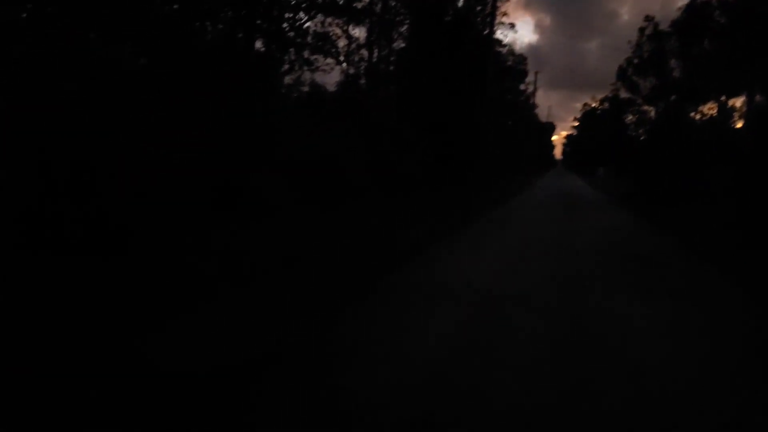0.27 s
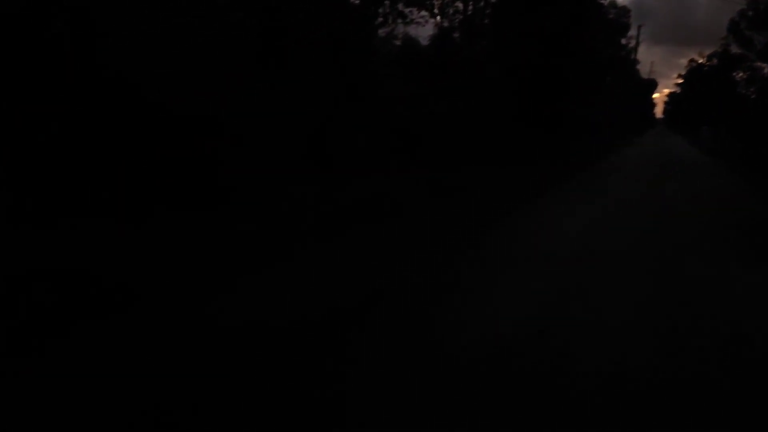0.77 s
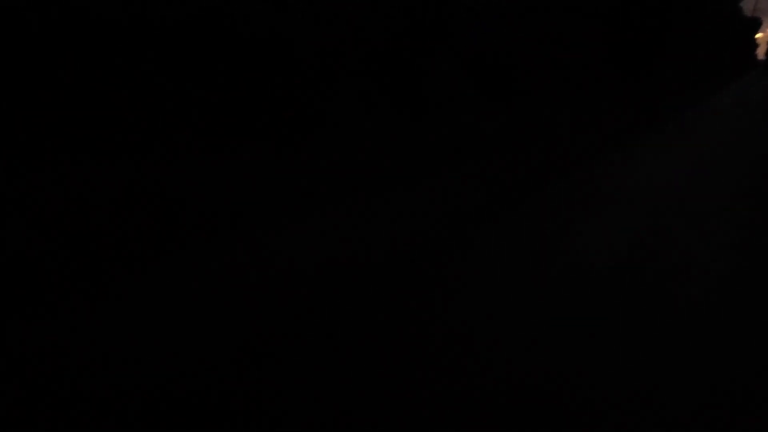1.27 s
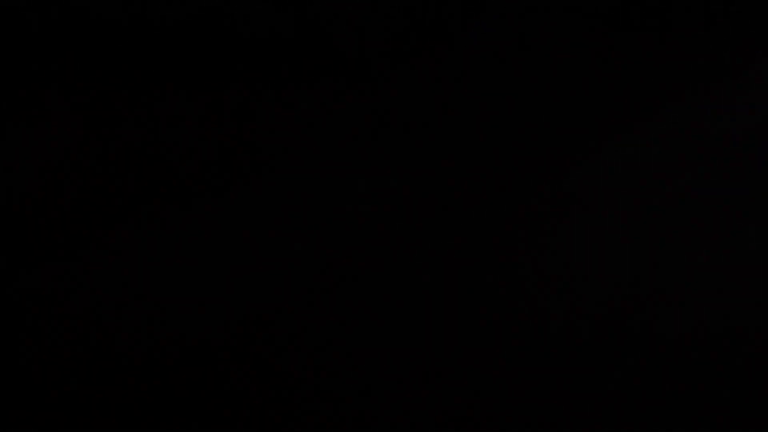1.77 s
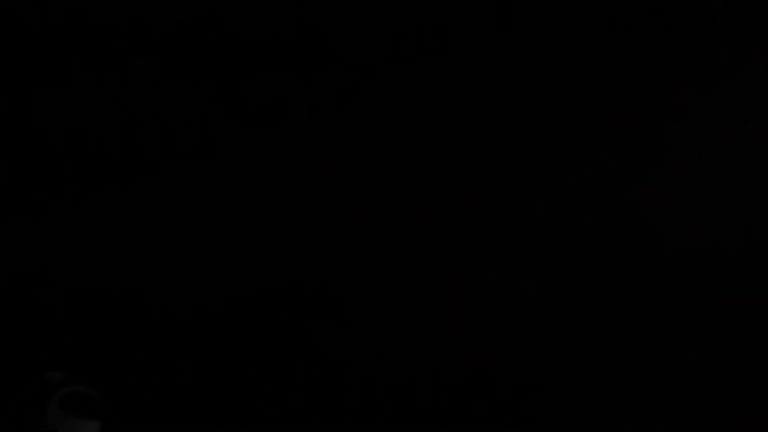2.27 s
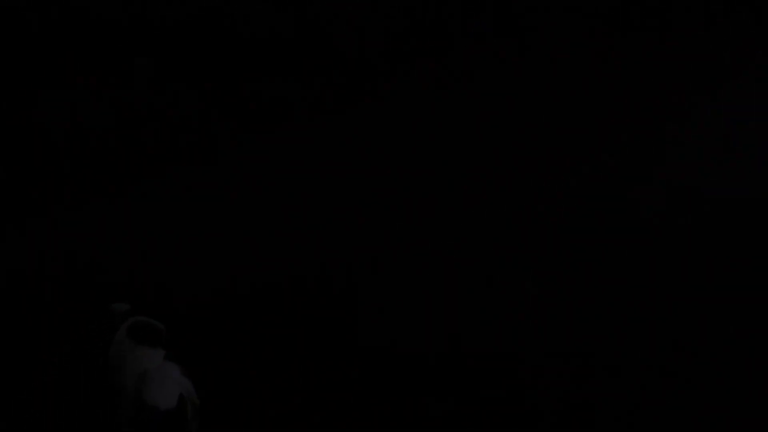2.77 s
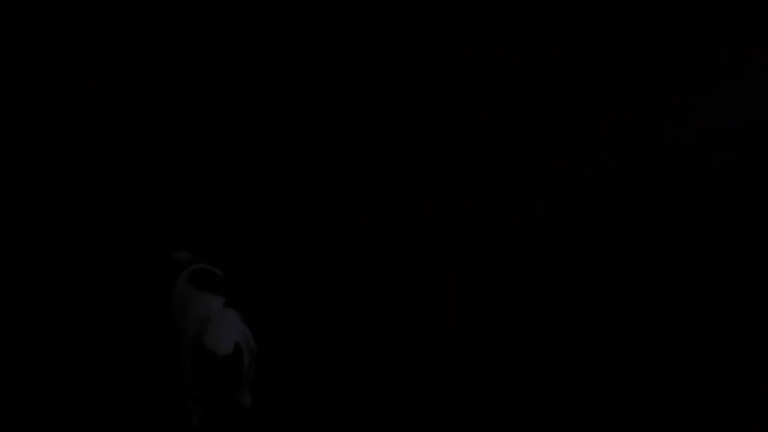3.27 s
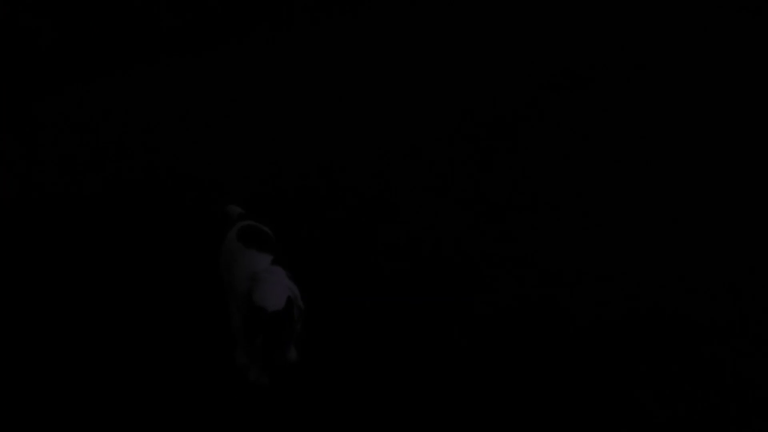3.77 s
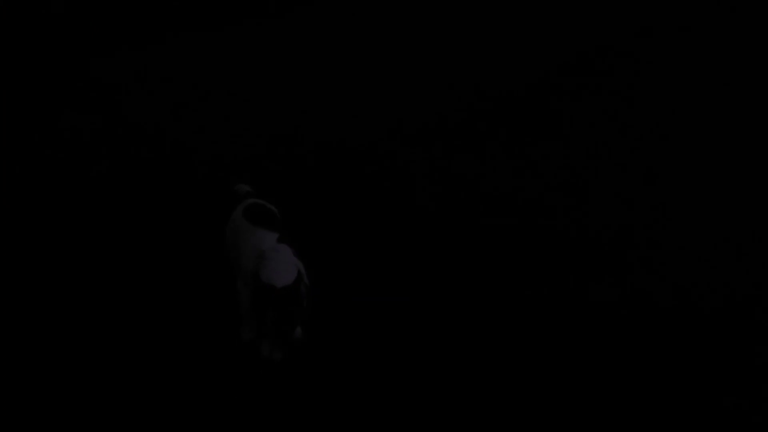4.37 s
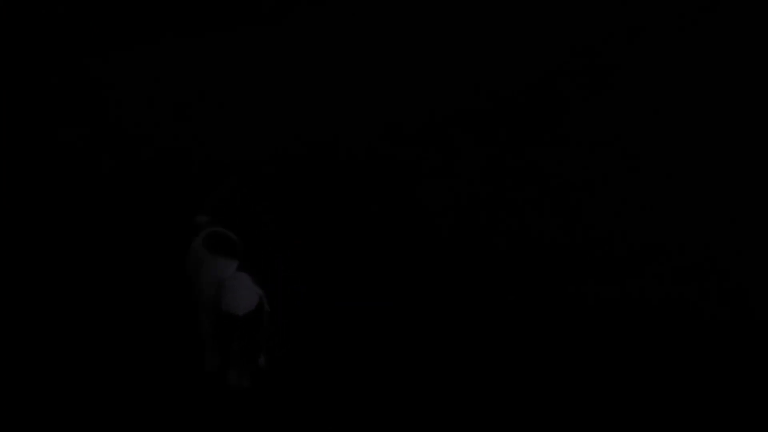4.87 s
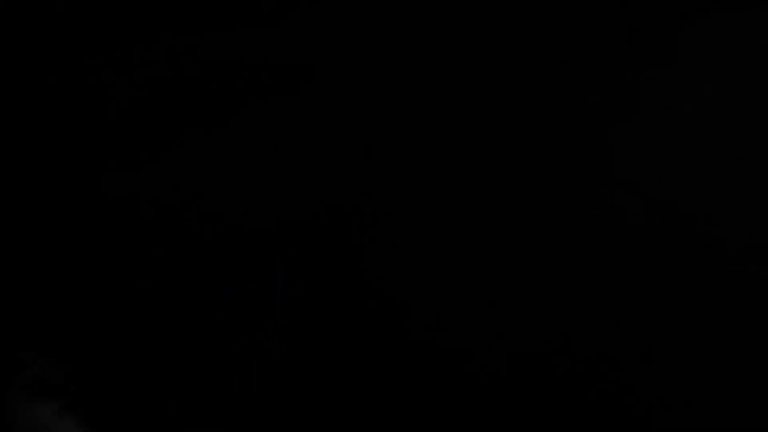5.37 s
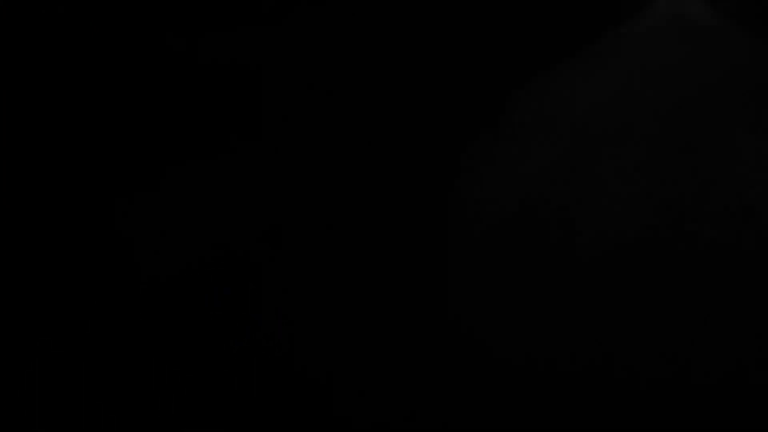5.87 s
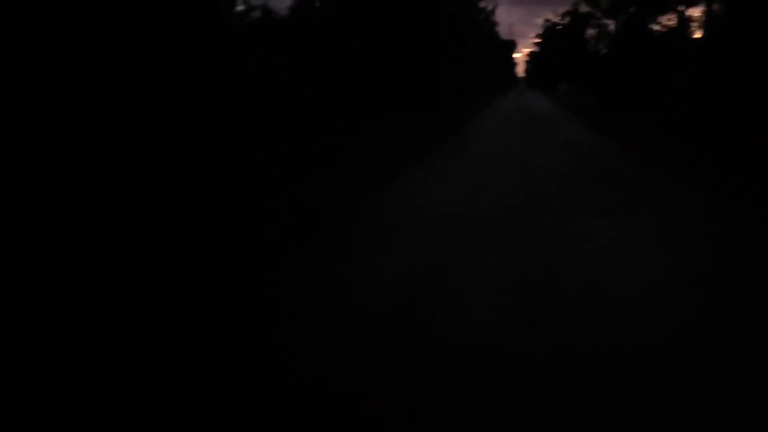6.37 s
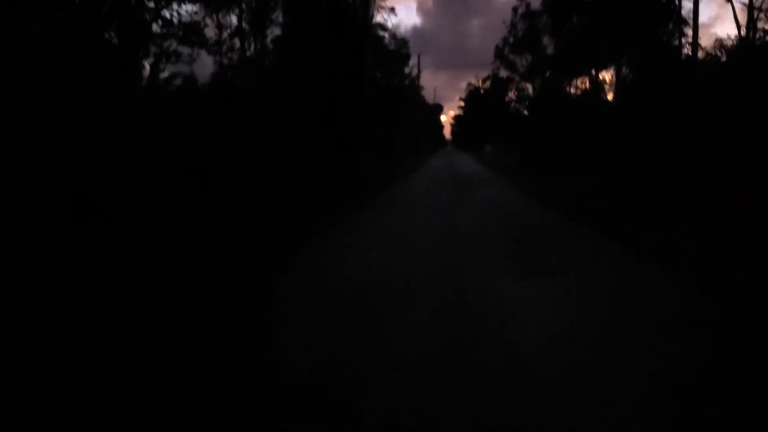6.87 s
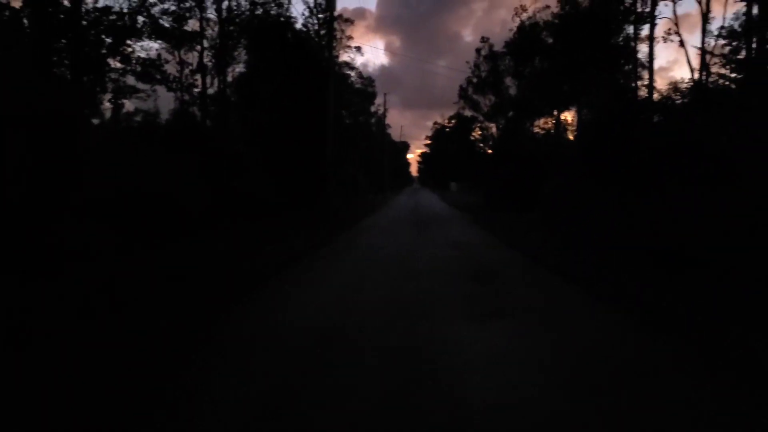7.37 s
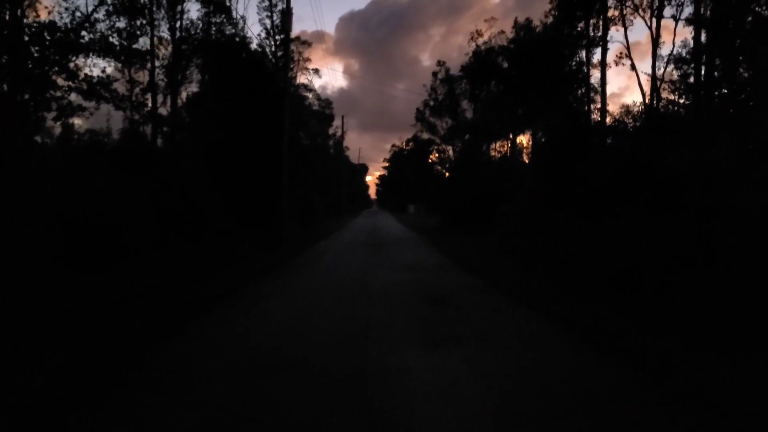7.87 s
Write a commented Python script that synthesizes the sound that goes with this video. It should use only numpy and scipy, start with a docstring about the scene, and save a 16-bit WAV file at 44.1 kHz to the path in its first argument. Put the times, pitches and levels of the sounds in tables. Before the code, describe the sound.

A handheld stereo microphone outdoors among trees catches a quiet night chorus: shimmering insects around 4.5 kHz, overlapping two-note frog calls, falling chirps and quick twitters with scattered echoes, faint low rumble. Three upward whistled whoops stand out midway. Occasional dull handling taps occur; near seven seconds a very close, dry cluster of hard clicks bursts out, pauses, then a softer, slower creaking rattle runs to the end.

```python
"""A steady insect band and small coqui frogs peeping all around, on a forest road.
Nearer, a whistler whoops three times and thin high chirps swoop down: gliding tones, scattered by the trunks.
Something held close to the microphone knocks softly, then rattles in two short runs of stick-slip snaps:
short forces ring its modes. Air, rumble, insects and the merged far callers are coloured noise."""
import sys
import numpy as np
from scipy import signal
from scipy.fft import rfft, irfft
from scipy.io import wavfile

SR = 44100
rng = np.random.default_rng(int(sys.argv[2]) if len(sys.argv) > 2 else 0)


def inscribe(sig):
    """Save sig as 16-bit PCM at rate SR to the path in sys.argv[1].

    A 1-D sig is mono; a 2-D sig holds one channel per row.
    Samples are clipped to [-1, 1] before scaling.
    """
    pcm = np.round(np.clip(np.atleast_2d(sig).T, -1, 1) * 32767)
    wavfile.write(sys.argv[1], SR, pcm.astype(np.int16))


N = 357210
TIME_S = np.arange(N) / SR

# In all tables: call levels are before echoes; L-R above zero is louder on the left.

# rising "qui" of the frogs: [t/s, length/s, top f/Hz, rise/Hz, level/dB before QUI_GAIN_DB, L-R/dB, roughness]
QUI_NOTES = [(0.205, 0.14, 2920, 490, -53, 6, 0), (1.4, 0.091, 2660, 90, -60.5, 27, 0.3),
             (1.471, 0.21, 2930, 149, -63, 33, 0.37), (1.535, 0.055, 2590, 230, -59.5, 4, 0.24),
             (1.687, 0.17, 2887, 508, -53.5, 39, 0), (3.631, 0.11, 2880, 222, -60, 32, 0.5),
             (4.416, 0.13, 2825, 395, -54.5, -34, 0), (4.652, 0.14, 3914, 257, -58, -11, 0),
             (5.36, 0.104, 2900, 90, -62, -5, 0.25), (5.543, 0.17, 2744, 698, -53, 4, .65),
             (5.677, 0.15, 2864, 381, -55.5, 0, 0.6), (5.803, 0.14, 2604, 330, -60.5, 5, 1.13),
             (7.192, .16, 2890, 376, -55.5, 34, 0.04)]
QUI_GAIN_DB = 3.5
# low, level "co" of the frogs on the right: [t/s, start f/Hz, sag/Hz, level/dB before CO_GAIN_DB]
CO_NOTES = [(1.015, 1590, -64, -63), (1.169, 1566, 26, -64), (1.381, 1635, 46, -57.5), (3.78, 1475, 5, -64),
            (4.385, 1463, -6, -63), (5.25, 1544, -25, -56), (5.28, 1494, 17, -54), (6.872, 1640, 23, -60),
            (7.13, 1560, 31, -64)]
CO_S, CO_PAN_DB, CO_GAIN_DB = 0.1, -15, -1.0

# whoops: [t/s at top of sweep, sweep level/dB, after-note level/dB, flick level/dB, time stretch/ratio]
WHOOPS = [(2.996, -46, -52, -59, 1.0), (3.902, -41, -51, -54, .96), (4.647, -42.5, -53, -54.5, 1.08)]
# whoop creeps up, lingers, sweeps: [t/s from top before stretch, f/Hz, level/dB re whoop]
SWEEP = [(-.2, 1570, -24), (-.155, 1700, -20), (-.125, 1860, -13), (-.1, 1905, -7), (-.08, 1930, -10),
         (-.069, 2100, 0), (-.054, 2270, 0), (-.041, 2490, -3), (-.023, 2620, -6), (-.013, 2690, -11),
         (0, 2800, -9), (.006, 2900, -20)]
# closing flick: [t/s from top before stretch, f/Hz, level/dB re flick level]
FLICK = [(0, 2800, -2), (.004, 3200, 0), (.007, 4000, 0), (.01, 4300, 1), (.014, 4350, -14)]
# soft falling after-note: [t/s from top before stretch, f/Hz, level/dB re after-note level]
AFTER_NOTE = [(.13, 1720, -12), (.165, 1660, -5), (.205, 1590, -3), (.24, 1470, -7), (.275, 1300, -12),
              (.32, 1220, -24)]
WHOOP_LAG_S = 0.0004   # delay of the left channel

# near falling chirps: [t/s, hold at top/s (at least .002 is used), top f/Hz, time to fall halfway/s, level/dB]
CHIRPS = [(1.318, 0.015, 6000, 0.026, -55.5), (1.694, 0.0056, 7150, 0.046, -64),
          (1.998, 0.02, 5750, 0.021, -54.5), (2.555, 0.011, 6000, .017, -56),
          (2.551, 0.026, 6900, .025, -62), (2.788, 0.0045, 6100, 0.034, -60),
          (2.915, 0.0045, 6500, 0.039, -69), (3.879, 0.016, 6150, 0.039, -60.5),
          (3.949, .004, 4700, 0.032, -56.5), (4.117, 0.0041, 7150, 0.058, -56.5),
          (4.406, 0.017, 5900, 0.024, -52.5), (4.585, 0.0037, 4900, 0.022, -54.5),
          (4.782, 0.014, 6050, 0.017, -56.5), (5.139, 0.03, 6950, 0.028, -61),
          (5.252, 0.013, 6900, 0.021, -60.5), (5.988, 0.035, 7020, 0.03, -59),
          (6.144, 0.0052, 6900, 0.046, -58), (6.24, 0.0054, 5840, 0.033, -59),
          (6.435, 0.0056, 6340, 0.037, -59), (7.171, 0.0036, 5280, 0.038, -53.5),
          (7.818, 0.0091, 7200, 0.055, -54), (7.987, .022, 6050, 0.017, -53.5)]
# twitters, quick syllables ending in a plunge: [t/s, syllables/count, top f/Hz, level/dB]
TWITTERS = [(0.62, 2, 6040, -58), (3.446, 2, 6120, -56.5), (5.666, 2, 6080, -56.5), (6.574, 4, 6430, -53),
            (6.70, 3, 6560, -58)]
CHIRP_PAN_DB = 9
# bend of the top (share of pitch), pitch the fall heads for, loss halfway down
CHIRP_ARCH, CHIRP_END_HZ, CHIRP_FADE_DB = .03, 2750, 8
# plunge: start, time to fall halfway, level re syllables
PLUNGE_HZ, PLUNGE_FALL_S, PLUNGE_DB = 5200, 0.029, -2

# far shrill calls, blurred to a hiss by the wood: [t/s, start f/Hz, level/dB before envelope and flutter]
SHRILL = [(0.078, 6550, -64.5), (0.559, 6000, -63.5), (1.159, 6480, -62.5), (1.687, 5930, -64),
          (2.281, 5980, -63.5), (2.758, 6550, -60.5), (3.371, 5760, -65), (3.85, 5770, -64),
          (4.39, 6640, -62.5), (4.889, 6320, -60.5), (5.048, 6420, -63.5), (5.851, 6130, -61),
          (6.312, 6600, -60), (7.119, 6280, -58), (7.546, 6740, -61)]
SHRILL_S, SHRILL_SAG_HZ_PER_S, SHRILL_PAN_DB = 0.36, 550, 3.5

# rattle snaps: [t/s, ringing/dB, click/dB, after-slips/dB, favoured f/Hz, second-hit delay/s, its level/dB re first]
SNAPS = [(6.9495, -18, -12, -31.5, 2070, .006, -15), (6.9795, -16.5, -12.5, -26, 1880, .0042, -8),
         (7.0151, -21.5, -11.5, -27.5, 2000, .0045, -13), (7.0558, -16.5, -25, -30.5, 1770, .0046, -9),
         (7.1073, -39, -64, -40, 1400, .004, -8), (7.2967, -24.5, -25, -30.5, 1870, .004, -10.5),
         (7.5128, -30, -54, -29.5, 1240, .0055, -8), (7.5726, -24, -43, -35, 1550, .0014, -14),
         (7.586, -29.5, -50, -32.5, 1610, .004, -8), (7.655, -21.5, -37, -25, 2140, .0065, -16),
         (7.703, -23.5, -21.5, -26.5, 2130, .007, -7), (7.766, -26.5, -32, -30, 1900, .0035, 3),
         (7.8159, -19.5, -36, -29, 1870, .003, -12), (7.8683, -24, -33.5, -32, 1380, .003, -9),
         (7.9232, -23, -46, -29.5, 1680, .0035, -23), (7.971, -34, -49, -35.5, 1430, .005, 2),
         (8.037, -33.5, -50, -36.5, 1460, .006, 0)]
# rattle resonances: [f/Hz, width/Hz, level/dB before favouring and scatter]
RATTLE_MODES = [(306, 99, -10), (545, 91, -10), (765, 226, -11), (1218, 156, -8), (1500, 120, -7.5),
                (1833, 133, 1), (1898, 360, -4.5), (2300, 550, -14.5)]
# thin crack of a hard snap: [f/Hz, width/Hz, relative level/dB]
CRACK_MODES = [(3600, 620, -2.5), (4530, 710, -5.5), (5700, 500, 4), (12000, 4800, -19)]
# hollow thud under a snap: [f/Hz, width/Hz, relative level/dB]
THUD_MODES = [(537, 110, -3), (870, 320, -1.5)]
THUD_DB = -17.5   # re the stronger of ringing and click
CLICK_HZ, CLICK_WIDTH_HZ = 2036, 630   # a few cycles long
# low-mode lift at the usual strength, and its change per dB of strength
USUAL_SNAP_DB, LOW_MODES_DB, LOW_MODES_FOLLOW = -16.5, -0.5, -0.18
RATTLE_LAG_S = -0.000058   # below zero: left hears first
RATTLE_LOW_CUT_HZ = 157   # too small a body to radiate bass

# soft handling knocks: [t/s, tap peak/dB, L-R/dB, favoured f/Hz]
KNOCKS = [(.4525, -40.5, -7, 700), (1.0995, -38, -12, 700), (1.1505, -47, -9, 1200), (1.582, -36, -12, 650),
          (1.6145, -47, -9, 700), (3.787, -46, -4, 800), (5.688, -45.5, -1, 1200), (5.732, -48.5, -2, 1200),
          (6.612, -33.5, -1, 1000), (6.857, -48, -3, 700)]
# knock resonances: [f/Hz, width/Hz, level/dB before favouring]
KNOCK_MODES = [(128, 65, 3.5), (644, 230, 3), (1156, 210, 8.5), (1980, 6000, -7.5)]
FAVOUR_DB, FAVOUR_OCTAVES = 6, 0.35   # lift and reach of favoured modes

# handling rustle: [t/s, level/dB before flicker]
RUSTLE = [(0, -101), (3.4, -87), (3.5, -69), (3.6, -68), (3.7, -75), (6.1, -75), (6.3, -67), (6.5, -69.5),
          (6.9, -62), (7.1, -62.5), (7.45, -66), (7.8, -62), (8.1, -63)]
# rustle colour: [f/Hz, relative density/dB per Hz]
RUSTLE_COLOUR = [(80, 7), (280, 2.5), (500, -1), (1000, 2), (1900, 4.5), (3000, -1.5), (8000, -23.5),
                 (15000, -28.5)]
RUSTLE_FLICKER_DB = 3.5

# insect band: [f/Hz, relative density/dB per Hz]
INSECTS = [(3900, -28), (4200, -12.5), (4410, 4.5), (4550, -0.5), (4720, 3), (4850, -9), (5020, -20),
           (5400, -64)]
# far frogs merged into two bands: [f/Hz, relative density/dB per Hz]
FAR_FROGS = [(1200, -45.5), (1420, -6.5), (1530, -0.5), (1680, -7.5), (1950, -9.5), (2300, -13),
             (2600, -0.5), (2850, -5), (3100, -9), (4000, -11), (5000, -7.5)]
# furthest shrill calls merged into a sheen: [f/Hz, relative density/dB per Hz]
FAR_TREBLE = [(4700, -16), (5300, -14), (5800, -9), (6300, -7), (6700, -12), (7200, -20), (7800, -32)]
# still air: [f/Hz, relative density/dB per Hz]
AIR = [(120, -17.5), (250, -19.5), (365, -12.5), (460, -22.5), (850, -20.5), (1250, -13), (2000, -22),
       (4000, -26.5), (7000, -45), (8300, -37), (15500, -34)]
# low rumble of a far road: [f/Hz, relative density/dB per Hz]
RUMBLE = [(20, -21), (45, -3), (75, 1.5), (115, -4), (160, -10), (250, -12.5), (400, -31.5)]
HUM_HZ, HUM_DB = 119.6, -76.5
DRONE_DB, DRONE_WIDTH_HZ = -80, 40   # rough overtone at 3x hum; width of each of two resonances
FOREST_T60_S, CUTOFF_HZ = .7, 15800


def frogs():
    """Nearer frogs: each "co" stays nearly level, each "qui" climbs to its top pitch."""
    low, high = np.zeros((2, 2, N))
    for s, hz, sag_hz, level_db in CO_NOTES:
        note = frog_note(CO_S, hz, hz - sag_hz, rough=0)
        add(low, s, from_db(level_db + CO_GAIN_DB) * note, CO_PAN_DB)
    for s, length_s, top_hz, rise_hz, level_db, pan_db, rough in QUI_NOTES:
        note = frog_note(length_s, top_hz - rise_hz, top_hz, rough)
        add(high, s, from_db(level_db + QUI_GAIN_DB) * note, pan_db)
    low = forest(low, wet_db=-7, early_s=.07, late_db=-8)
    high = forest(high, wet_db=-4, early_s=.055, late_db=-10)
    return low + high


def frog_note(length_s, start_hz, end_hz, rough):
    """Pitch glides fast, then levels off as the note swells and fades; roughness adds wobble and flutter."""
    u = np.linspace(0, 1, int(length_s * SR))
    hz = start_hz + (end_hz - start_hz) * (1 - (1 - u) ** 1.7)
    swell = np.abs(np.sin(np.pi * u)) ** .8
    return whistle(hz, swell, jitter=.003 + .018 * rough, flutter_db=1.5 + 3.5 * rough)


def whoops():
    """An unbroken upward sweep sets the wood ringing; the flick and soft falling note are drier."""
    loud, soft = np.zeros((2, 2, N))
    for s, sweep_db, after_db, flick_db, stretch in WHOOPS:
        parts = ((SWEEP, sweep_db, loud), (AFTER_NOTE, after_db, soft), (FLICK, flick_db, soft))
        for shape, level_db, track in parts:
            at_s, hz, shape_db = np.transpose(shape) * [[stretch], [1], [1]]
            t = np.arange(at_s[0], at_s[-1], 1 / SR)
            envelope = from_db(level_db + np.interp(t, at_s, shape_db))
            note = whistle(np.interp(t, at_s, hz), envelope, jitter=.009, flutter_db=2.3)
            add(track, s + at_s[0], note, pan_db=-3)
    loud = forest(loud, wet_db=-2.5, early_s=.06, late_db=-18)
    soft = forest(soft, wet_db=-7, early_s=.05, late_db=-16)
    return lag_left(loud + soft, WHOOP_LAG_S)


def chirps(syllable_s):
    """Near chirps, and twitters whose falling syllables end in a softer plunge."""
    out = np.zeros((2, N))
    u = np.linspace(0, 1, int(0.026 * SR))
    for s, syllables, top_hz, level_db in TWITTERS:
        for k in range(round(syllables)):
            hz = top_hz * (1 - .12 * u ** 1.5)
            syllable = whistle(hz, from_db(level_db) * np.sin(np.pi * u), jitter=.008, flutter_db=3)
            add(out, s + k * syllable_s, syllable, pan_db=6)
        plunge = swoop(PLUNGE_HZ, 0, PLUNGE_FALL_S, level_db + PLUNGE_DB)
        add(out, s + round(syllables) * syllable_s, plunge, CHIRP_PAN_DB)
    for s, hold_s, top_hz, fall_s, level_db in CHIRPS:
        add(out, s, swoop(top_hz, hold_s, fall_s, level_db), CHIRP_PAN_DB)
    return forest(out, wet_db=-1, early_s=.04, late_db=-14)


def swoop(top_hz, hold_s, fall_s, level_db):
    """A thin, ragged whistle arches over its top and plunges, fading as it falls."""
    hold_s = max(hold_s, .002)
    t = np.arange(-hold_s, 2.2 * fall_s, 1 / SR)
    u = np.maximum(t, 0) / fall_s
    arch = 1 - CHIRP_ARCH * np.minimum(np.abs(2 * t / hold_s + 1), 1) ** 2
    hz = CHIRP_END_HZ + (top_hz * arch - CHIRP_END_HZ) * 2 ** -(u ** 1.25)
    return whistle(hz, from_db(level_db - CHIRP_FADE_DB * np.sqrt(u)), jitter=.016, flutter_db=3.5)


def rattle(rebound_s, spread_s, body_hz, crack_db, scatter_db):
    """Stick-slip snaps: click, ringing double hit, after-slips; weak ones ring lower, hard ones crack more."""
    out = np.zeros((2, N))
    impulse = signal.unit_impulse(SR // 8)
    first = soften(impulse, body_hz, order=8)
    click_force = resonate(soften(impulse, 3380, order=8), CLICK_HZ, CLICK_WIDTH_HZ)
    click = strike(click_force, [(CLICK_HZ, CLICK_WIDTH_HZ, 0)], pan_db=-7.0)
    thud = from_db(THUD_DB) * strike(soften(impulse, 1210, order=4), THUD_MODES, pan_db=-5.5)
    crack_force = impulse + 0.67 * slips(0.0004, 0.0016, count=4)
    crack = strike(soften(crack_force, 7800, order=4), CRACK_MODES, pan_db=-3.0)
    for s, ring_db, click_db, after_db, centre_hz, second_s, second_db in SNAPS:
        strength_db = max(ring_db, click_db)
        low_db = min(LOW_MODES_DB + LOW_MODES_FOLLOW * (strength_db - USUAL_SNAP_DB), 9)
        detune = rng.normal(1, .018, len(RATTLE_MODES))
        modes = [(hz * shift, width_hz, db + low_db * (hz < 1650) + rng.normal(0, scatter_db))
                 for shift, (hz, width_hz, db) in zip(detune, favour(RATTLE_MODES, centre_hz))]
        after = soften(slips(rebound_s, spread_s, count=16), 0.9 * body_hz, order=8)
        # tiny slips as the strain builds and settles
        creep = soften(slips(0, 0.03, count=30), 1.6 * body_hz, order=8)
        hit = strike(first, modes, pan_db=-8.0)
        crack_gain = from_db(crack_db + 1.3 * (click_db + 17.5))   # grows faster than the click
        add(out, s, from_db(click_db) * click + crack_gain * crack, 0)
        add(out, s, from_db(ring_db) * hit + from_db(strength_db) * thud, 0)
        add(out, s + second_s, from_db(ring_db + second_db) * hit, 0)
        add(out, s, from_db(after_db) * strike(after, modes, pan_db=-4.5), 0)
        add(out, s - .008, from_db(after_db - 15) * strike(creep, modes, pan_db=-7), 0)
    low_cut = signal.butter(2, RATTLE_LOW_CUT_HZ, "high", fs=SR, output="sos")
    return lag_left(signal.sosfilt(low_cut, out + 1e-18), RATTLE_LAG_S)


def knocks(soft_hz, scuff_db):
    """Dull taps on the held body, each inside a brief scuff of the fingers."""
    out = np.zeros((2, N))
    tap = soften(signal.unit_impulse(SR // 8), soft_hz, order=4)
    for s, level_db, pan_db, centre_hz in KNOCKS:
        modes = favour(KNOCK_MODES, centre_hz)
        scuff = soften(slips(0, 0.017, count=20), soft_hz, order=2)
        add(out, s, from_db(level_db) * strike(tap, modes, pan_db), 0)
        add(out, s - .006, from_db(level_db + scuff_db) * strike(scuff, modes, pan_db), 0)
    return out


def rustle():
    """Handling rustle: flickering coloured noise, almost alike in both channels."""
    level_db = np.interp(TIME_S, *np.transpose(RUSTLE)) + RUSTLE_FLICKER_DB * drift(70, N)
    return from_db(level_db) * noise(RUSTLE_COLOUR, alike=0.99, pan_db=-2.5)


def strike(force, modes, pan_db):
    """A force rings modes; the held body shades the far microphone above the bass. Mid peak 1."""
    side = np.array([[1], [-1]])
    ring = 0
    for k, (hz, width_hz, db) in enumerate(modes):
        shade_db = side * pan_db / 2 * min(hz / 1300, 1)
        ring = ring + (-1) ** k * from_db(db + shade_db) * resonate(force, hz, width_hz)
    return ring / np.abs(ring.mean(0)).max()


def favour(modes, centre_hz):
    """Where the contact lands decides which modes ring most."""
    favoured = []
    for hz, width_hz, db in modes:
        distance = np.log2(hz / centre_hz) / FAVOUR_OCTAVES
        favoured.append((hz, width_hz, db + FAVOUR_DB * np.exp(-distance ** 2)))
    return favoured


def soften(force, hz, order):
    """A soft contact spreads the force in time: a low-pass."""
    return signal.sosfilt(signal.butter(order, min(hz, .45 * SR), fs=SR, output="sos"), force)


def slips(delay_s, spread_s, count):
    """A short cluster of uneven clicks, thinning out."""
    force = np.zeros(SR // 8)
    delays_s = delay_s + spread_s * rng.random(count) ** 2.0
    force[(delays_s * SR).astype(int)] = rng.normal(0, 1, count) * np.exp(-delays_s / spread_s)
    return force


def shrill_calls(half_width_hz, rise_s):
    """Each far call is a band of hiss that swells quickly, sinks in pitch and dies away."""
    out, t = np.zeros((2, N)), np.arange(0, SHRILL_S, 1 / SR)
    envelope = (1 - np.exp(-t / rise_s)) * (1 - (t / SHRILL_S) ** 2)
    for s, hz, level_db in SHRILL:
        baseband = soften(rng.standard_normal((2, 2, SR)), half_width_hz, order=4)
        real, imaginary = baseband[..., :len(t)]
        phase = 2 * np.pi * np.cumsum(hz - SHRILL_SAG_HZ_PER_S * t) / SR
        hiss = rms_one(real * np.cos(phase) + imaginary * np.sin(phase))
        add(out, s, hiss * envelope * from_db(level_db + 2 * drift(90, len(t))), SHRILL_PAN_DB)
    return out


def far_chirps(level_db, count):
    """Many fainter swoops from further off, heard mostly through their echoes."""
    out = np.zeros((2, N))
    for k, (when, size, pace, near) in enumerate(rng.random((count, 4))):
        chirp = swoop(3900 + 2500 * size, .004, 0.022 + 0.025 * pace, level_db + 4 * near)
        add(out, (k + when) / count * N / SR, chirp, pan_db=2.0)
    return forest(out, wet_db=3, early_s=.03, late_db=-12)


def far_frogs(level_db, count):
    """Many two-note calls from deep in the wood, each with a pitch of its own."""
    out = np.zeros((2, N))
    for k, (when, size, near, side) in enumerate(rng.uniform(-1.1, 1, (count, 4))):
        s = (k + when / 2) / count * N / SR
        pitch = 1 + .12 * size
        gain = from_db(level_db + 2.1 * near)
        co = frog_note(0.078, 1570 * pitch ** .8, 1540 * pitch ** .8, rough=0.31)
        qui = frog_note(0.11, 2400 * pitch, 2880 * pitch, rough=0.92)
        add(out, s - .15, gain * from_db(-2.5) * co, 6 * side - 3)
        add(out, s, gain * qui, 6 * side + 2)
    return forest(out, wet_db=11, early_s=.08, late_db=-6)


def night():
    """The bed: noise bands of insects, far chorus, air and rumble, with a faint hum and rough overtone."""
    insects = from_db(-60.0 + 1.3 * drift(60, N)) * noise(INSECTS, alike=0.021, pan_db=2.5)
    chorus = from_db(-63.0) * noise(FAR_FROGS, alike=0.022, pan_db=-1.5)
    treble = from_db(-67.0) * noise(FAR_TREBLE, alike=0.018, pan_db=4.0)
    air = from_db(-69.5) * noise(AIR, alike=0.063, pan_db=0.5)
    rumble = from_db(-69) * noise(RUMBLE, alike=0.71, pan_db=-4.5)
    # the hum fades in and out over the first and last half second
    hum_level = from_db(HUM_DB + 2 * drift(7.3, N))
    hum = whistle(np.full(N, HUM_HZ), hum_level, jitter=0.015, flutter_db=-1.5)
    drone = rng.standard_normal((2, N))
    for _ in range(2):
        drone = resonate(drone, 3 * HUM_HZ, DRONE_WIDTH_HZ)
    drone = from_db(DRONE_DB) * rms_one(drone)
    return insects + chorus + treble + air + rumble + hum + drone


def forest(x, wet_db, early_s, late_db):
    """Near trunks scatter a quick run of separate echoes; the deeper wood adds a faint long tail."""
    t = np.arange(SR) / SR
    decay = np.exp(-t / early_s) + from_db(late_db - 60 * t / FOREST_T60_S)
    decay *= 1 - np.exp(-t / 0.0066)   # soft onset
    trunks = rng.standard_normal((3, SR)) * (rng.random(SR) < 900 / SR)   # about 900 echoes/s
    echoes = (trunks[:2] + 0.1 * trunks[2]) * decay
    echoes /= np.sqrt(np.sum(echoes ** 2, axis=1)[:, None])
    return x + from_db(wet_db) * signal.fftconvolve(x.mean(0)[None], echoes, axes=1)[:, :N]


def whistle(hz, envelope, jitter, flutter_db):
    """A nearly pure tone, slightly unsteady in pitch and level, with soft ends."""
    size = len(hz)
    phase = 2 * np.pi * np.cumsum(hz * (1 + jitter * drift(250, size))) / SR
    flutter = from_db(flutter_db * drift(122.7, size))
    return np.sqrt(2) * np.sin(phase) * envelope * flutter * signal.windows.tukey(size, .12)


def resonate(x, hz, width_hz):
    """One two-pole resonance, gain about 1 on top."""
    r = np.exp(-np.pi * width_hz / SR)
    zeros = np.array([1, 0, -1]) * (1 - r * r) / 2
    poles = [1, -2 * r * np.cos(2 * np.pi * hz / SR), r * r]
    return signal.lfilter(zeros, poles, x)


def noise(spectrum, alike, pan_db):
    """Stereo noise of a given colour and left-right correlation; rms 1."""
    hz, level_db = np.transpose(spectrum)
    log_hz = np.log(np.arange(N // 2 + 1) * SR / N + 1)   # +1 Hz avoids log(0)
    gain = from_db(np.interp(log_hz, np.log(hz), level_db, left=-90, right=-90))
    mid, side = irfft(rfft(rng.standard_normal((2, N))) * gain, N)
    alike = np.clip(alike, -1, 1)
    pair = np.sqrt(1 + alike) * mid + np.sqrt(1 - alike) * side * [[1], [-1]]
    return rms_one(pair * from_db([[pan_db / 2], [-pan_db / 2]]))


def drift(rate_hz, size):
    """Random values at a given rate, joined by straight lines; spread just under 1."""
    knots = np.arange(size) * rate_hz / SR
    return np.interp(knots, np.arange(4096), rng.standard_normal(4096))


def lag_left(x, lag_s):
    """Sound from one side reaches the two microphones at different moments: delay the left."""
    hz = np.arange(N // 2 + 1) * SR / N
    left = irfft(rfft(x[0]) * np.exp(-2j * np.pi * hz * lag_s), N)
    return np.array([left, x[1]])


def add(out, start_s, sound, pan_db):
    """Mix a sound into the stereo track; panning keeps its power."""
    i = round(start_s * SR)
    sound = sound[..., max(-i, 0):max(N - i, 0)]
    i = max(i, 0)
    out[:, i:i + sound.shape[-1]] += rms_one(from_db([[pan_db / 2], [-pan_db / 2]])) * sound


def from_db(db):
    """Decibels to amplitude."""
    return 10 ** (np.asarray(db) / 20)


def rms_one(x):
    """Scale to rms 1."""
    return x / np.sqrt(np.mean(x ** 2) + 1e-20)


def scene():
    """Callers in the wood and treetops, the handling close by, and the night bed."""
    callers = frogs() + whoops() + far_frogs(level_db=-77.5, count=64)
    treetops = chirps(syllable_s=0.026) + far_chirps(level_db=-69, count=90)
    treetops = treetops + shrill_calls(half_width_hz=724, rise_s=0.0093)
    snaps = rattle(rebound_s=0.0027, spread_s=0.0077, body_hz=2760, crack_db=-31.0, scatter_db=4.5)
    handling = snaps + knocks(soft_hz=2900, scuff_db=-9.5) + rustle()
    return callers + treetops + handling + night()


def record(dry):
    """The top is cut steeply above CUTOFF_HZ."""
    return signal.sosfilt(signal.ellip(10, .1, 70, CUTOFF_HZ, fs=SR, output="sos"), dry)


dry = scene()
out = record(dry)
inscribe(out)
```